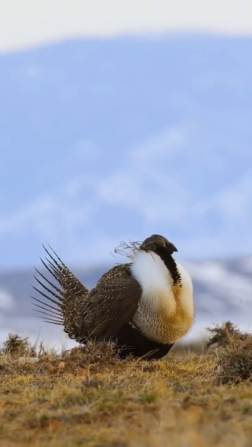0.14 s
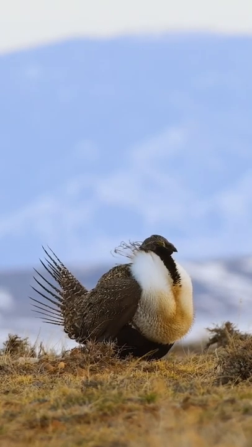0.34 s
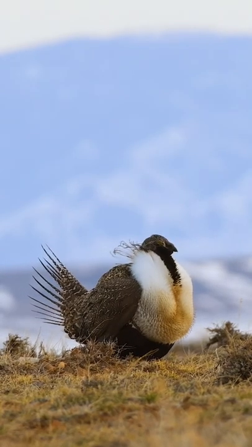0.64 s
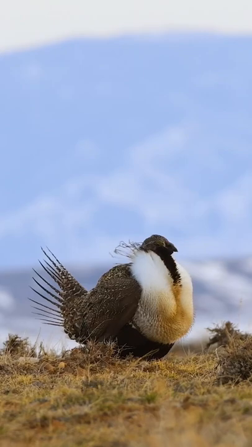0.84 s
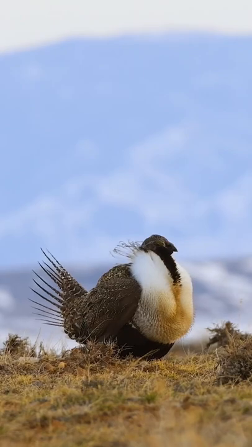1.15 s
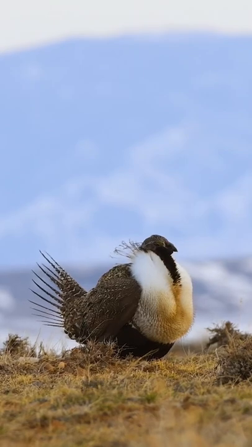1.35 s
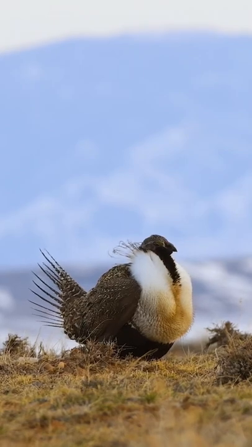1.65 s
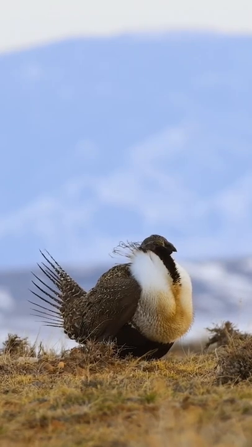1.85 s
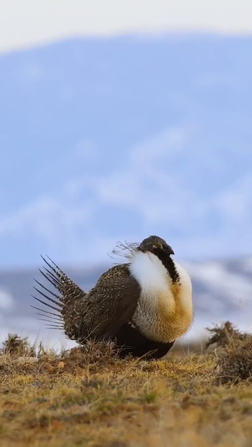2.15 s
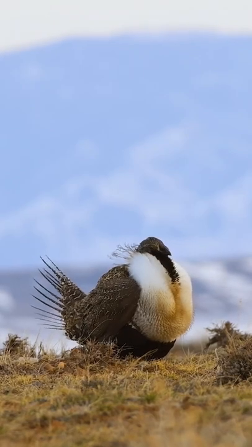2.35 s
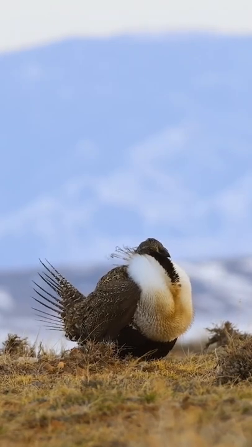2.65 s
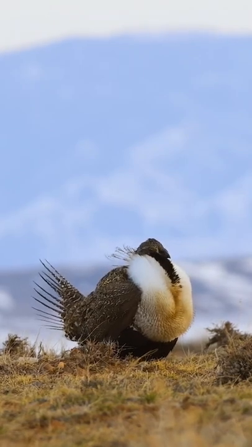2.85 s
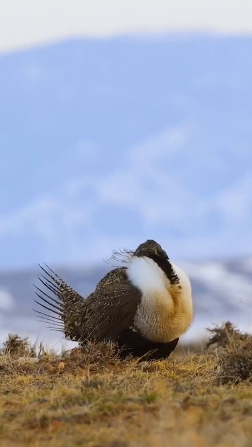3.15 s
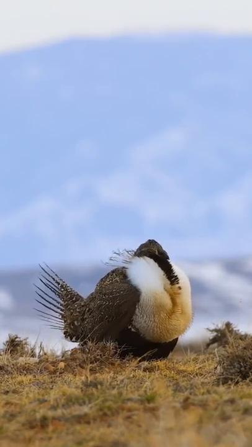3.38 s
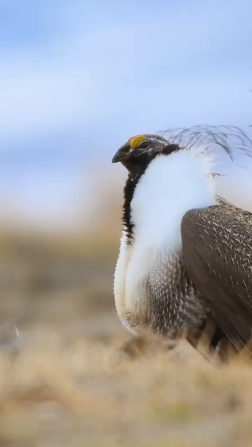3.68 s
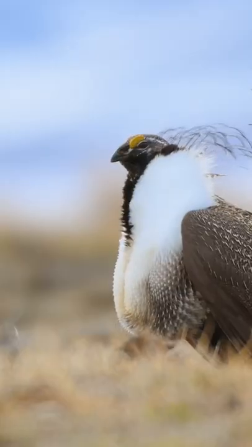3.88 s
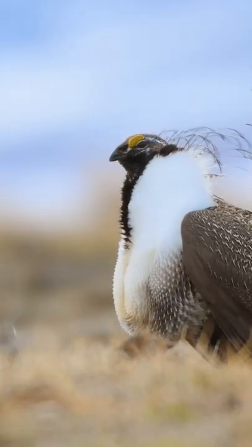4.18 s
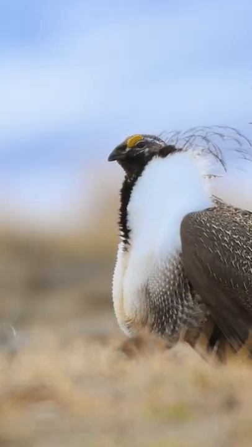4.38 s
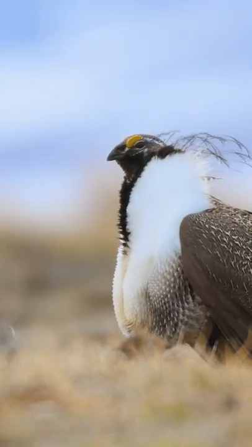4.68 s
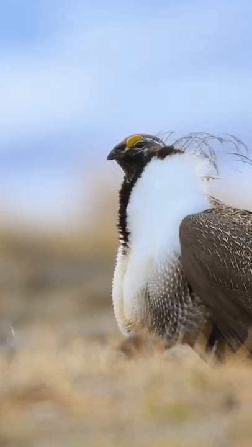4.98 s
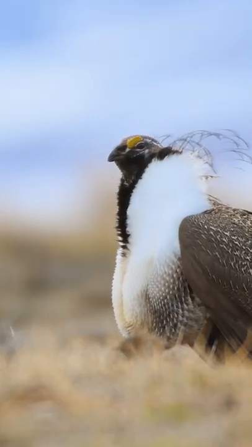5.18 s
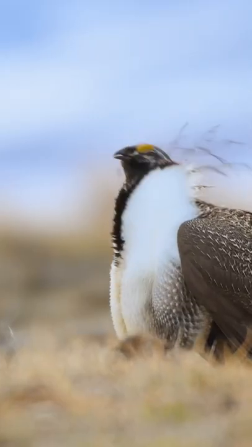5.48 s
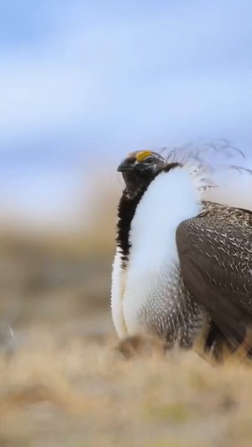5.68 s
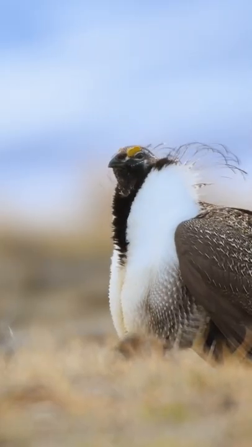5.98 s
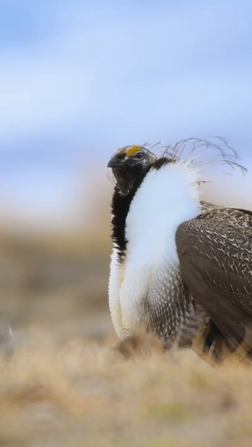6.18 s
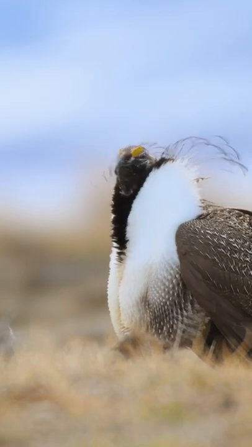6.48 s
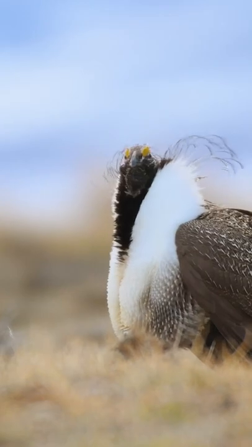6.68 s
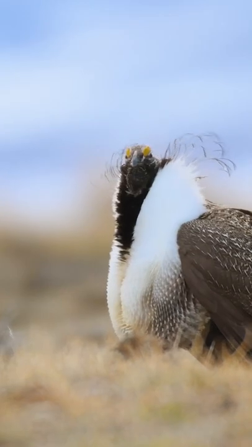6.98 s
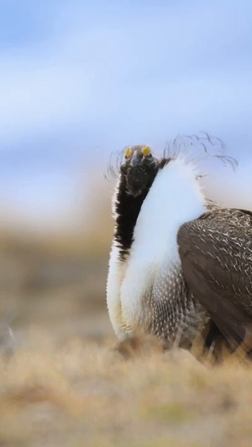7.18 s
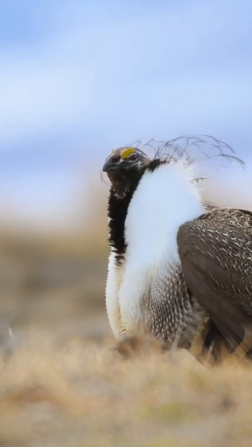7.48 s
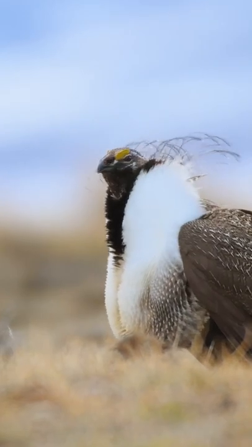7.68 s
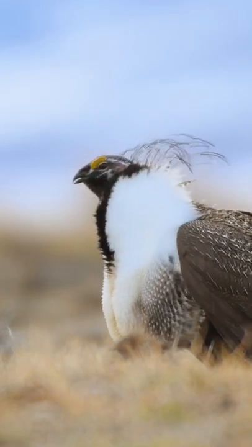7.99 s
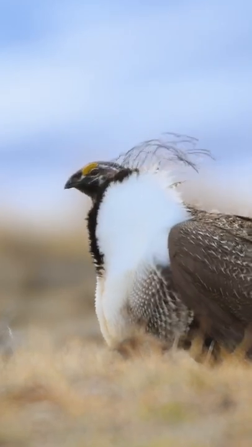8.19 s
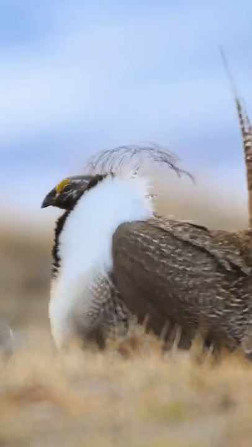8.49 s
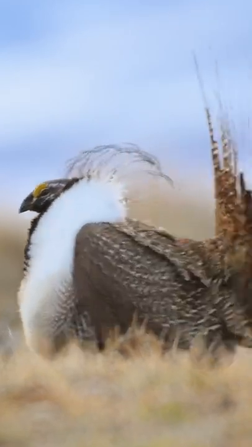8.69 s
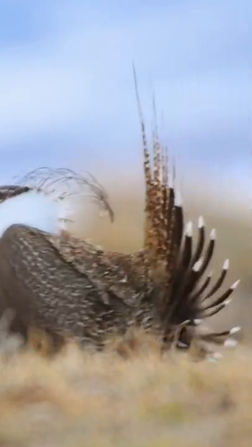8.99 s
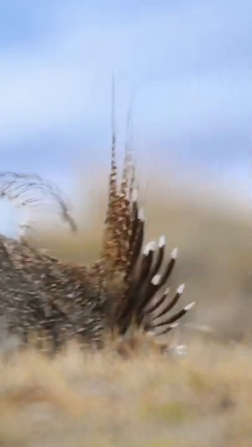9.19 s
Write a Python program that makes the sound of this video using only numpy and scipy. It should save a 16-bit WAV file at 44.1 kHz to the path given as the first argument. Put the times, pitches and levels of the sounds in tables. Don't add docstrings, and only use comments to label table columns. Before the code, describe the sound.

A grouse display ground in open grassland. From the start, countless far air sacs pop at a low, hollow pitch, blending into a fluctuating, bubbling murmur, with nearer rounded pops crowding the first second and a dull thump at 0.1 s. Around 1.7-1.9 s and 2.7-2.9 s, soft raspy wing swishes mix with tiny high chirps. At 3.3 s taut skin snaps with sharp ticks and a thump, a very short whistle rises and falls, and a loud pop lands at 3.5 s. A soft coo comes at 4.5 s, a thump at 4.7 s, a bright chirp at 5.9 s. Pops thicken near 8 s with a hollow double knock, then a clearer coo at 8.65 s, a thump at 8.85 s and a strong pop at 9.05 s, before a faint closing swish and chirps. Low wind buffets and quiet wide hiss persist.

```python
import sys
import numpy as np
from scipy import signal
from scipy.fft import rfft, irfft, next_fast_len
from scipy.io import wavfile
from scipy.ndimage import uniform_filter1d

SR = 44100
rng = np.random.default_rng(int(sys.argv[2]) if len(sys.argv) > 2 else 0)


def voltage_ratio(level):
    return 10 ** (np.asarray(level, float) / 20)


def master(y):
    cut = np.clip(np.atleast_2d(y).T, -1, 1)
    pcm = np.round(cut * 32767)
    wavfile.write(sys.argv[1], SR, pcm.astype(np.int16))


N = 411894


def add(out, s, piece):
    i = max(int(s * SR), 0)
    out[i:i + len(piece)] += piece[:len(out) - i]


def coloured(x, colour):
    hz, db = np.transpose(colour)
    size = next_fast_len(len(x))
    f = np.log(np.maximum(np.fft.rfftfreq(size, 1 / SR), 1))
    gain = voltage_ratio(np.interp(f, np.log(hz), db, left=-90, right=-90))
    y = irfft(rfft(x, size) * gain, size)[:len(x)]
    return y / np.sqrt(np.mean(y ** 2))


def evened(x, seconds):
    return x / np.sqrt(uniform_filter1d(x ** 2, int(seconds * SR)) + 1e-3)


def spells(s, fade, db, lull_db):
    t = np.arange(N) / SR
    coarse = t[::64]
    swell_db = db[:, None] - 6 * np.abs(coarse - s[:, None]) / np.abs(fade)[:, None]
    power = np.sum(voltage_ratio(2 * swell_db), axis=0) + voltage_ratio(2 * lull_db)
    return np.interp(t, coarse, np.sqrt(power))


def pop(hz, t60, rise=.003, sag=0.045):
    t = np.arange(int((t60 + .01) * SR)) / SR
    shape = (1 - np.exp(-(t / rise) ** 2)) * np.exp(-np.log(1000) * t / t60)
    bent_time = t + sag * 0.0096 * (1 - np.exp(-t / 0.0094))
    return shape / shape.max() * np.sin(2 * np.pi * hz * bent_time)


def crowd(count=1500):
    # (frequency [Hz], level [dB per Hz])
    crowd_colour = [(76, -49), (130, -26.5), (187, -12.5), (237, -22.5), (260, -5), (294, -4.5), (329, .5),
                    (356, -4), (413, -3), (456, -18.5), (496, -16), (533, -33), (620, -29), (810, -54),
                    (1360, -120)]
    # (frequency [Hz], level [dB per Hz])
    deep_colour = [(120, -20), (150, -9.5), (185, 4.5), (220, -0.5), (250, -4)]
    # (time [s], time to fade 6 dB [s], level [dB])
    surges = [(.12, 0.35, -30), (.34, 0.08, -27), (.58, 0.18, -29), (.88, .03, -26.5), (1.01, .05, -25.5),
              (1.29, 0.08, -33.5), (1.45, 0.1, -28.5), (1.61, 0.06, -26), (1.85, 0.15, -28),
              (2.05, 0.13, -31), (2.24, 0.06, -28.5), (2.5, 0.2, -30), (2.8, .1, -31), (3.06, .14, -28.5),
              (3.3, 0.07, -25), (3.54, .03, -22.5), (3.7, 0.09, -29.5), (3.82, 0.08, -29.5),
              (4.0, 0.34, -28), (4.25, .12, -29), (4.5, 0.09, -27.5), (4.78, .14, -30), (5.12, 0.4, -28.5),
              (5.36, 0.05, -27.5), (5.65, 0.3, -28.5), (6.27, 0.08, -25), (6.55, 0.4, -28),
              (6.92, .14, -31), (7.36, 0.08, -29), (7.57, 0.21, -26.5), (7.93, 0.08, -25), (8.02, .02, -24),
              (8.13, .06, -29), (8.37, 0.15, -30), (8.62, .1, -33), (9.15, 0.6, -31)]
    # (time [s], time to fade 6 dB [s], level [dB])
    deep_surges = [
        (.39, 0.4, -46),
        (1.95, .2, -56),
        (2.5, 0.2, -50),
        (3.41, 0.15, -36.5),
        (3.59, 0.12, -41),
        (4.14, .1, -51),
        (4.75, .2, -47),
        (5.51, .15, -46),
        (7.2, 0.37, -45),
        (8.92, .14, -44),
    ]
    pops = np.zeros(N)
    for when, pitch, size, ring in rng.random((count, 4)):
        loudness = voltage_ratio(-2.5 * np.log(size + 1e-3))
        add(pops, when * N / SR, loudness * pop(245 * 2.1 ** pitch, 0.051 + 0.095 * ring, 0.0041))
    blur = coloured(rng.standard_normal(N), crowd_colour)
    murmur = evened(coloured(pops, crowd_colour) + voltage_ratio(-3) * blur, .08)
    deep = evened(coloured(rng.standard_normal(N), deep_colour), 0.13)
    return (murmur * spells(*np.transpose(surges), lull_db=-35) * voltage_ratio(-2.6)
            + deep * spells(*np.transpose(deep_surges), lull_db=-59.5))


def separate_pops(table, rise):
    out = np.zeros(N)
    for s, db, hz, t60 in table:
        add(out, s - rise, voltage_ratio(db) * pop(hz, t60, rise))
    return out


def near_sacs():
    # (time [s], peak [dB], sac pitch [Hz], time to ring down 60 dB [s])
    loud_pops = [(0.315, -13.5, 286, 0.13), (0.34, -19.9, 322, 0.19), (0.458, -14.8, 310, 0.04),
                 (0.522, -13.5, 310, 0.04), (0.59, -19.7, 322, 0.19), (0.674, -14.8, 334, 0.06),
                 (0.86, -16.2, 310, 0.09), (0.992, -15.4, 322, 0.19), (1.063, -18.1, 334, 0.13),
                 (1.273, -19.7, 334, 0.19), (1.589, -16.9, 334, 0.13), (1.64, -19.5, 334, 0.19),
                 (1.815, -18.5, 334, 0.19), (2.013, -19.6, 310, 0.19), (2.227, -19.3, 322, 0.19),
                 (2.682, -17.0, 322, 0.13), (3.248, -15.5, 274, 0.06), (3.298, -14.4, 322, 0.09),
                 (3.461, -18.9, 322, 0.19), (3.532, -5.7, 274, 0.04), (3.546, -13.6, 262, 0.04),
                 (3.55, -18.5, 334, 0.13), (3.611, -19.8, 322, 0.19), (3.708, -19.2, 322, 0.19),
                 (3.85, -17.4, 322, 0.09), (3.922, -15.9, 334, 0.19), (4.03, -16.4, 334, 0.19),
                 (5.147, -18.5, 334, 0.19), (5.356, -16.0, 334, 0.13), (5.63, -18.4, 322, 0.19),
                 (5.664, -19.7, 334, 0.19), (5.71, -19.0, 322, 0.19), (6.067, -18.6, 322, 0.19),
                 (6.25, -16.8, 322, 0.13), (6.491, -17.6, 334, 0.19), (6.609, -17.7, 322, 0.09),
                 (6.658, -19.2, 334, 0.19), (7.359, -13.7, 346, 0.04), (7.465, -18.7, 322, 0.13),
                 (7.547, -17.4, 334, 0.19), (7.656, -18.4, 322, 0.19), (7.905, -15.4, 310, 0.13),
                 (7.929, -14.8, 322, 0.19), (7.966, -18.1, 322, 0.19), (8.045, -18.2, 274, 0.19),
                 (8.094, -12.7, 310, 0.19), (8.131, -15.1, 334, 0.09), (8.371, -18.8, 322, 0.19),
                 (9.05, -6.5, 274, 0.09), (9.073, -18.3, 334, 0.19)]
    # (time [s], peak [dB], sac pitch [Hz], time to ring down 60 dB [s])
    soft_pops = [(0.27, -20, 285, 0.07), (0.715, -21, 342, 0.07), (1.396, -22, 334, 0.07),
                 (1.503, -20, 404, 0.07), (1.772, -20, 296, 0.07), (2.421, -21, 347, 0.07),
                 (2.539, -22, 272, 0.07), (2.981, -21, 339, 0.07), (3.382, -21, 342, 0.07),
                 (4.407, -20, 361, 0.07), (4.48, -20, 326, 0.07), (5.961, -23, 296, 0.07),
                 (6.197, -22, 366, 0.07), (6.316, -20, 342, 0.07), (7.578, -19, 334, 0.07),
                 (8.02, -19, 315, 0.07), (8.487, -21, 326, 0.07), (8.741, -27, 334, 0.07)]
    # (time [s], peak [dB], sac pitch [Hz], time to ring down 60 dB [s])
    thumps = [(0.112, -15.5, 172, 0.057), (0.31, -21, 216, 0.076), (3.246, -20.5, 227, 0.12),
              (3.3397, -14, 165, 0.06), (3.353, -26, 185, .06), (3.524, -21, 205, 0.15),
              (3.556, -21.5, 205, .09), (4.619, -22, 201, 0.17), (4.674, -16.5, 167.7, 0.11),
              (6.383, -25.5, 172, 0.097), (6.568, -21, 242, 0.068), (7.026, -29, 215, 0.15),
              (8.069, -20, 198, 0.12), (8.41, -32, 125, .12), (2.05, -33, 150, .12),
              (8.845, -15.5, 175, 0.06), (8.861, -26.5, 175, .09), (8.092, -26, 125, .06),
              (4.705, -28.5, 185, .13), (9.043, -26, 246, 0.1)]
    return (separate_pops(loud_pops, 0.00554) * voltage_ratio(-4.5)
            + separate_pops(soft_pops, 0.006) * voltage_ratio(-4)
            + separate_pops(thumps, 0.0031))


def band(x, hz, width):
    edges = [max(hz - width / 2, 20), min(hz + width / 2, .45 * SR)]
    return signal.sosfilt(signal.butter(6, edges, "bandpass", fs=SR, output="sos"), x)


def snaps():
    # (time [s], peak [dB], centre [Hz], width [Hz], time to die 60 dB [s])
    cracks = [(.107, -26, 720, 450, 0.036), (3.3346, -24, 3500, 1000, 0.008),
              (3.345, -33, 2700, 1800, 0.03), (3.353, -37, 2600, 2400, .08), (3.338, -30, 1540, 400, 0.027),
              (3.391, -38, 4000, 2500, .01), (3.5195, -41, 3000, 1400, 0.02), (3.534, -39, 2800, 900, 0.03),
              (3.543, -34, 3000, 1900, .06), (3.566, -38, 3200, 1300, .04), (3.741, -43, 3500, 700, 0.044),
              (3.77, -41, 3500, 900, .015), (3.905, -44, 3450, 800, .02), (.171, -45, 4600, 1600, .04),
              (.211, -44, 4700, 1800, .015), (.256, -46, 4100, 1600, .015), (3.223, -44, 3900, 1500, .015),
              (4.611, -31, 540, 250, .06), (6.38, -47, 3100, 900, .015), (8.27, -47, 4200, 1600, .015),
              (4.612, -30.5, 2400, 2600, 0.0044), (4.669, -33, 700, 400, .04), (.107, -39, 1250, 800, .02),
              (4.671, -41.5, 1700, 1610, .01), (8.083, -35, 890, 400, .06), (8.047, -35, 2700, 2800, 0.014),
              (8.083, -37, 2500, 2500, .02), (8.840, -24, 680, 520, 0.021), (8.841, -45, 1900, 500, .03),
              (9.043, -33, 620, 300, .04)]
    out = np.zeros(N)
    t = np.arange(int(.2 * SR)) / SR
    for s, db, hz, width, t60 in cracks:
        tail_db = -14.5 - 7 * np.log2(hz / 1000)
        burst = np.exp(-np.log(1000) * t / t60) + voltage_ratio(tail_db) * np.exp(-t / 0.039)
        click = 1.42 * np.sqrt(SR / width) * (t == 0)
        crack = band(burst * rng.standard_normal(len(t)) + click, hz, width)
        add(out, s, voltage_ratio(db) * crack / np.abs(crack).max())
    return out


def scattered(note, echo_db):
    t = np.arange(int(.12 * SR)) / SR
    ground = rng.standard_normal(len(t)) * np.exp(-t / .019) * (t > .004)
    heard = voltage_ratio(echo_db) * signal.fftconvolve(note, ground / np.sqrt(np.sum(ground ** 2)))
    add(heard, 0, note)
    return heard


def short_notes(table, arch, rough, echo_db, roundness, lean=.75):
    out = np.zeros(N)
    for s, length, first, last, db in table:
        u = np.arange(int(length * SR)) / (length * SR)
        hz = first + (last - first) * u + 2 * arch * (first + last) * u * (1 - u)
        flutter = 1 + rough * np.interp(u, np.linspace(0, 1, 8), rng.standard_normal(8))
        swell = np.sin(np.pi * u ** lean) ** roundness
        note = voltage_ratio(db) * flutter * swell * np.sin(2 * np.pi * np.cumsum(hz) / SR)
        add(out, s, scattered(note, echo_db))
    return out


def skin():
    # (time [s], length [s], first pitch [Hz], last pitch [Hz], peak [dB])
    ticks = [
        (3.3347, .0015, 2300, 2250, -8),
        (3.336, .0015, 2400, 2350, -8.5),
        (3.3377, .0014, 2100, 1900, -16),
        (3.339, .0014, 1900, 2400, -16),
        (3.3403, .0036, 1650, 2250, -18),
        (3.5268, .0016, 3000, 3000, -13.5),
        (3.545, .003, 3500, 3700, -34),
        (3.57, .003, 3300, 3300, -37),
    ]
    # (time [s], length [s], first pitch [Hz], last pitch [Hz], peak [dB])
    knocks = [
        (8.045, .013, 665, 655, -23),
        (8.045, .011, 1150, 1080, -37),
        (8.082, .014, 665, 650, -20.5),
        (8.081, .011, 1080, 1130, -36),
    ]
    return (short_notes(ticks, 0, .02, -18, 1.5, lean=.9)
            + short_notes(knocks, 0, .1, -9, 1.2, lean=.9))


def coos():
    # (time [s], length [s], first pitch [Hz], last pitch [Hz], peak [dB])
    hoots = [
        (4.44, 0.062, 545, 500, -32),
        (4.485, 0.066, 505, 480, -18.5),
        (8.645, 0.064, 483, 466, -14.5),
        (8.04, 0.18, 111.6, 90, -29.5),
        (4.667, 0.012, 650, 900, -38),
    ]
    return short_notes(hoots, .022, 0.1, -12, 2.2, lean=.9)


def long_glide(table, rough, echo_db):
    s, hz, db = np.transpose(table)
    out = np.zeros(N)
    t = np.arange(s[0], s[-1], 1 / SR)
    hz = uniform_filter1d(np.interp(t, s, hz), size=130)
    flutter = 1 + rough * np.interp(t, np.linspace(s[0], s[-1], 28), rng.standard_normal(28))
    tone = np.sin(2 * np.pi * np.cumsum(hz) / SR)
    add(out, s[0], scattered(flutter * voltage_ratio(np.interp(t, s, db)) * tone, echo_db))
    return out


def whistle():
    # (time [s], pitch [Hz], level [dB])
    path = [
        (3.350, 1080, -50),
        (3.360, 1220, -38.5),
        (3.381, 1520, -38),
        (3.388, 1800, -49),
        (3.393, 2040, -30),
        (3.406, 2230, -26),
        (3.415, 2000, -22),
        (3.42, 1600, -28),
        (3.424, 1300, -48),
    ]
    return long_glide(path, .15, -17)


def swishes(table, spread, pull, per_second=3000):
    out = np.zeros(N)
    u = np.arange(int(0.011 * SR)) / SR
    for s, rise, fall, db, centre in table:
        t = np.arange(-1.3 * rise, 1.3 * fall, 1 / SR)
        count = int(per_second * len(t) / SR)
        when, pitch, size, glide = rng.random((per_second, 4))[:count].T[:, :, None]
        octaves = spread * np.interp(when, [0, .5, 1], (.35, .48, .45))
        path = [centre + pull * (3325 - centre), centre, centre * (1 - .03)]
        middle = np.interp(when, [0, rise / (rise + fall), 1], path)
        offset = np.sign(pitch - .5) * np.abs(2 * pitch - 1) ** 1.45
        hz = middle * 2 ** (octaves * .5 * offset)
        squeak = np.sin(2 * np.pi * hz * u * (1 + 7.0 * (glide - .4) * u))
        squeaks = voltage_ratio(-2.0 * np.log(size + 0.0011)) * np.hanning(len(u)) * squeak
        place = (when * len(t)).astype(int) + np.arange(len(u))
        rake = np.bincount(place.ravel(), squeaks.ravel(), len(t))[:len(t)]
        edge = np.clip(np.minimum(t - t[0], t[-1] - t) / 0.022, 0, 1)
        stroke_db = db - 13 * np.abs(t / np.where(t < 0, rise, fall)) ** 2.1
        add(out, s + t[0], rake / np.sqrt(np.mean(rake ** 2)) * edge * voltage_ratio(stroke_db))
    return out


def wings():
    # (loudest time [s], rise [s], fall [s], peak [dB], feather pitch [Hz])
    strokes = [
        (1.73, .13, .15, -48, 2950),
        (2.775, .05, .06, -47, 3900),
        (1.875, .025, .045, -47, 3200),
        (2.785, .085, .045, -40, 3300),
        (2.83, 0.029, 0.058, -37.5, 3150),
        (5.875, .04, .05, -50, 3600),
        (7.49, .03, .03, -55, 3900),
        (9.25, .13, .09, -50, 3000),
        (9.33, .04, .03, -46, 3100),
    ]
    # (loudest time [s], rise [s], fall [s], peak [dB], centre pitch [Hz])
    soft_swells = [(1.73, .045, .04, -51, 2350), (1.78, .035, .035, -56.5, 5200),
                   (2.705, .025, .03, -53.5, 5500), (3.255, .03, .03, -55, 3600), (3.335, .035, .05, -52, 3100),
                   (3.445, .04, .035, -50, 1750), (3.46, .04, .03, -58, 3200), (4.115, .05, .055, -45, 3450),
                   (6.38, .03, .03, -59, 3000), (7.04, .05, .04, -58, 3000), (8.205, .03, .03, -56, 3150),
                   (9.29, .04, .04, -55, 2200), (2.785, .055, .055, -45, 4200), (4.13, .04, .04, -61, 4200),
                   (3.36, .02, .03, -49, 2400), (5.915, .03, .03, -57, 5800), (1.79, .02, .025, -58, 5200),
                   (3.45, .05, .05, -57, 3000)]
    return swishes(strokes, 1, 1) + swishes(soft_swells, .8, 0)


def larks():
    # (time [s], length [s], first pitch [Hz], last pitch [Hz], peak [dB])
    chirps = [(.655, 0.022, 4400, 4700, -53), (9.306, .014, 2420, 2520, -44),
              (9.317, .014, 2650, 2800, -43), (9.326, .012, 3500, 3450, -47),
              (1.705, .035, 2350, 1950, -54), (1.735, .022, 3450, 3650, -50),
              (1.858, .035, 5400, 5900, -57), (1.66, .055, 3290, 3200, -48), (1.847, .012, 1950, 2150, -50),
              (1.854, .008, 2300, 2750, -40), (1.864, 0.006, 2750, 3300, -34),
              (1.869, 0.018, 3430, 3550, -39), (2.762, .025, 5950, 6200, -53),
              (2.833, .014, 2690, 3410, -27), (2.838, 0.03, 2550, 2450, -43),
              (2.802, .022, 3850, 3700, -36), (2.76, .035, 3400, 3600, -40), (2.765, .04, 4300, 4500, -43),
              (2.868, .01, 3500, 3550, -39), (4.507, .014, 3070, 3060, -51), (4.528, .016, 3250, 3150, -46),
              (5.889, .012, 5580, 5670, -47), (5.865, 0.015, 3600, 3380, -41),
              (5.864, .01, 3120, 3300, -45), (5.881, .012, 3550, 3560, -43), (5.904, .029, 4960, 4860, -25),
              (6.012, .014, 5460, 5420, -51.5), (7.478, 0.013, 4550, 4500, -47.5),
              (7.582, 0.013, 3950, 3950, -49), (7.6, .016, 5800, 6250, -53), (8.575, .025, 2500, 3400, -53),
              (8.213, .012, 3600, 3800, -53)]
    # (time [s], length [s], first pitch [Hz], last pitch [Hz], peak [dB])
    scoops = [
        (1.765, 0.066, 3000, 2880, -48),
        (2.663, 0.028, 5750, 6000, -40),
        (2.728, 0.02, 3900, 4150, -31.5),
        (2.747, .013, 4300, 5500, -41),
        (2.806, 0.025, 3350, 3465, -24),
        (5.866, .018, 4780, 5600, -40),
        (5.886, 0.016, 3500, 4700, -47),
    ]
    # (time [s], pitch [Hz], level [dB])
    zigzag = [
        (1.731, 5400, -58),
        (1.737, 5250, -50),
        (1.75, 4850, -48),
        (1.757, 5800, -46),
        (1.766, 3900, -45),
        (1.772, 5700, -46),
        (1.779, 5900, -46),
        (1.783, 6000, -58),
    ]
    return (short_notes(chirps, 0, 0.35, -24, 0.66)
            + short_notes(scoops, -0.058, 0.3, -14, 0.6)
            + long_glide(zigzag, .15, -18))


def scraps():
    # (time [s], length [s], first pitch [Hz], last pitch [Hz], peak [dB])
    pieces = [(.683, .016, 4650, 4950, -52), (.708, .012, 5100, 5350, -56), (3.53, .009, 1950, 1980, -37),
              (3.54, .012, 2000, 2400, -43), (3.424, .018, 1200, 700, -46), (2.852, .011, 3450, 3750, -30),
              (2.807, .006, 3400, 3150, -25), (2.888, .01, 3200, 3300, -43), (2.825, .008, 3450, 3300, -30),
              (1.808, .022, 2550, 2900, -48), (9.238, .02, 2750, 2850, -49), (1.704, .008, 3100, 3200, -44),
              (4.672, .022, 930, 1150, -41)]
    return short_notes(pieces, 0, .3, -16, .7)


def wind():
    # (time [s], time to fade 6 dB [s] (sign ignored), thud level [dB], flap level [dB])
    gusts = [(0.0, .08, -48, -52), (.25, .06, -44, -51), (.58, .07, -44, -52), (1.35, 0.1, -40, -49),
             (1.71, .04, -39, -47), (2.0, .05, -33.5, -39), (2.3, 0.26, -47, -44.5),
             (2.55, 0.08, -43, -34.5), (3.04, 0.1, -44, -47), (3.35, 0.06, -48.5, -47),
             (3.77, .08, -49, -58), (4.09, .04, -57, -50), (4.24, .05, -56, -41), (4.76, .05, -35, -47),
             (5.75, .045, -33, -43), (5.81, .07, -43, -39), (6.02, .04, -39.5, -50),
             (6.3, 0.03, -45.5, -53), (7.1, .2, -53, -59), (7.31, -0.04, -62, -44.5), (7.41, .05, -48, -54),
             (7.72, -0.1, -48, -51), (7.98, 0.07, -41, -56), (8.09, 0.06, -56, -34),
             (8.69, .09, -36, -43.5), (8.87, 0.23, -55, -40.5), (9.13, .09, -36, -47)]
    # (frequency [Hz], level [dB per Hz])
    thud_colour = [(15, -25), (30, -2), (50, -2), (70, -8.5), (100, -29)]
    # (frequency [Hz], level [dB per Hz])
    flap_colour = [(40, -35), (65, -1.5), (100, 3.5), (135, -4.5), (190, -26)]
    s, fade, thud_db, flap_db = np.transpose(gusts)
    thud = evened(coloured(rng.standard_normal(N), thud_colour), 0.2)
    flap = evened(coloured(rng.standard_normal(N), flap_colour), 0.3)
    return spells(s, fade, thud_db, lull_db=-60.5) * thud + spells(s, fade, flap_db, lull_db=-54) * flap


def air():
    # (frequency [Hz], level [dB per Hz])
    mid_colour = [(60, -11), (200, -4), (600, -1.5), (950, -5.5), (1050, -10.5), (3900, -14.5), (4100, -18),
                  (8800, -19.5), (9100, -22.5), (15770, -23)]
    # (frequency [Hz], level [dB per Hz])
    side_colour = [(15, -39), (25, -10), (82, -2), (156, 0), (247, -5), (380, -9), (586, -3.5), (854, -6),
                   (1030, -8), (1500, -10), (1680, -9), (1820, -10.5), (2580, -10), (5000, -15),
                   (8220, -16.5), (15770, -20)]
    mid = voltage_ratio(-48) * coloured(rng.standard_normal(N), mid_colour)
    side = voltage_ratio(-52) * coloured(rng.standard_normal(N), side_colour)
    return np.array([mid + side, mid - side])


def scene():
    sacs = crowd() + near_sacs() + snaps() + skin()
    voices = coos() + whistle() + larks() + scraps()
    return sacs + voices + wings() + wind() + air()


def top_cut(x):
    return signal.sosfilt(signal.butter(12, 16480, fs=SR, output="sos"), x)


def record(dry):
    return top_cut(dry)


dry = scene()
out = record(dry)
master(out)
```